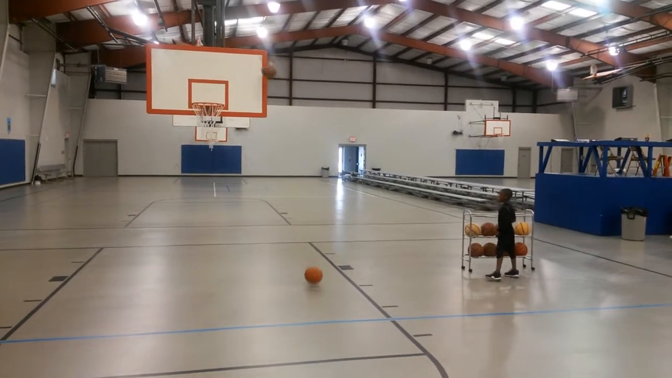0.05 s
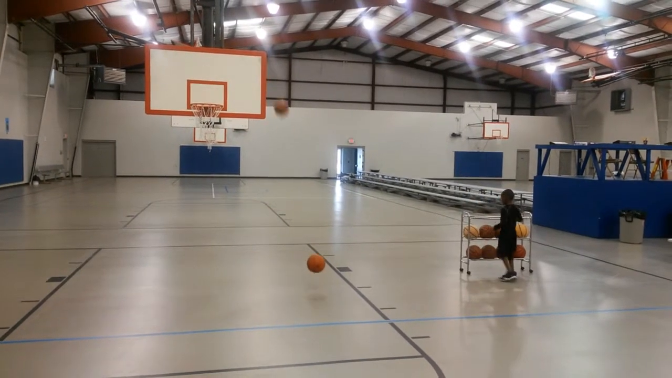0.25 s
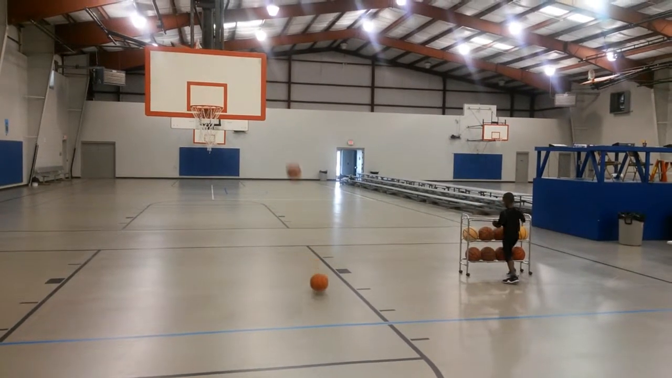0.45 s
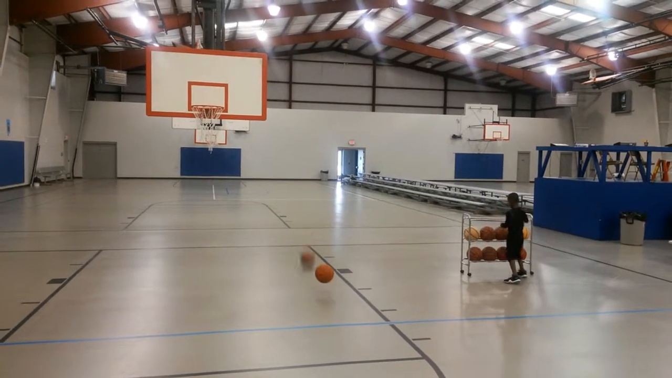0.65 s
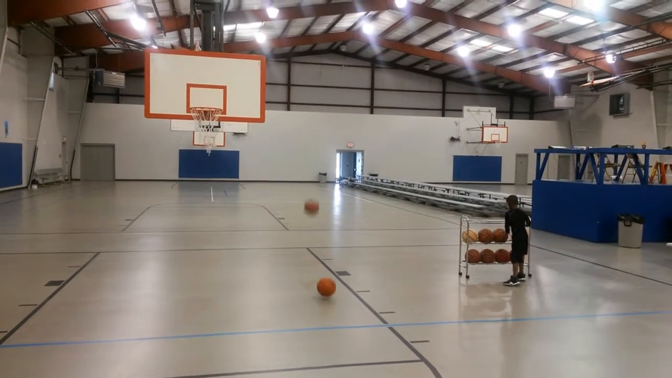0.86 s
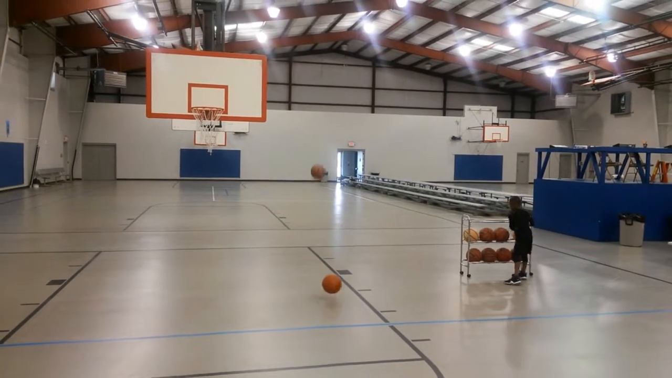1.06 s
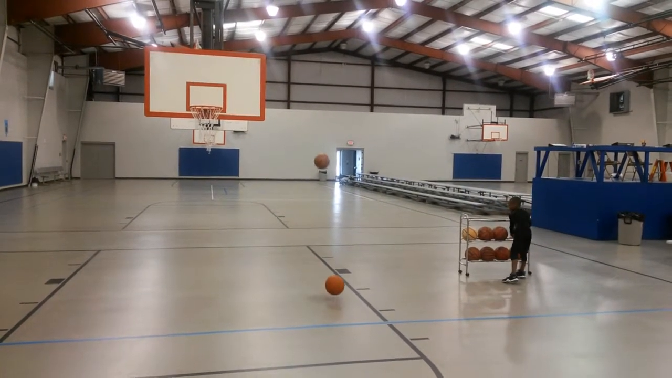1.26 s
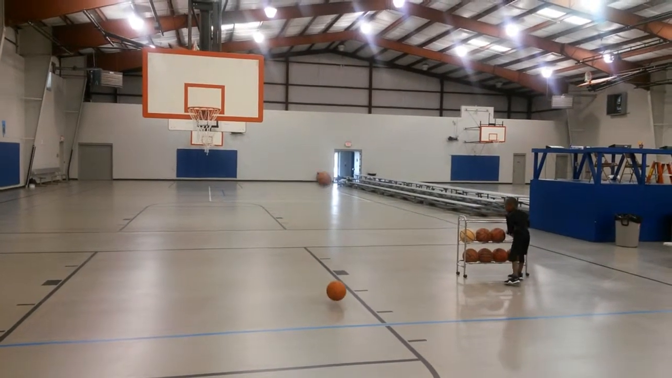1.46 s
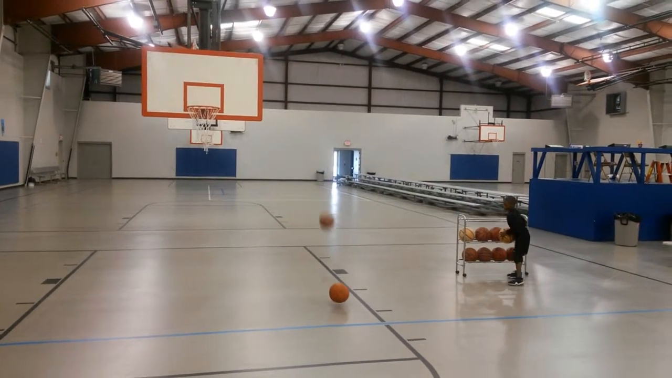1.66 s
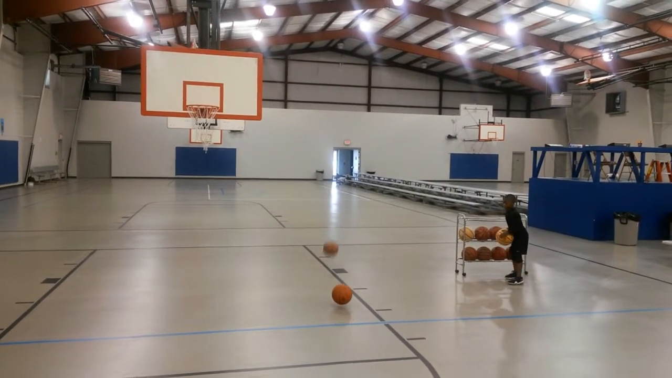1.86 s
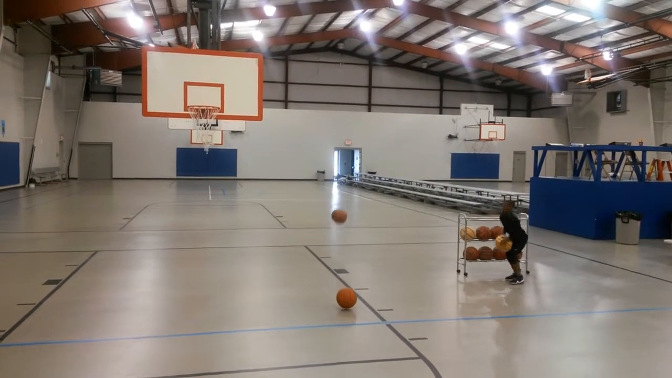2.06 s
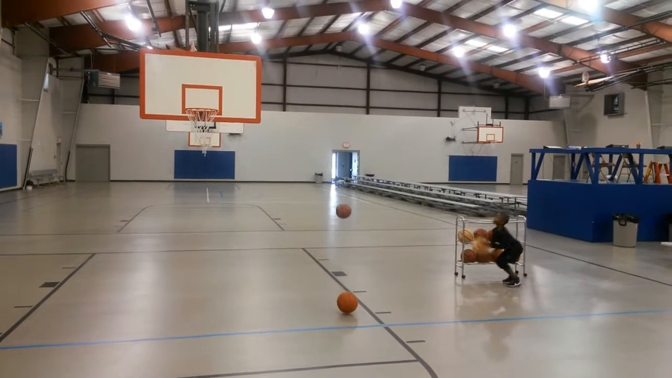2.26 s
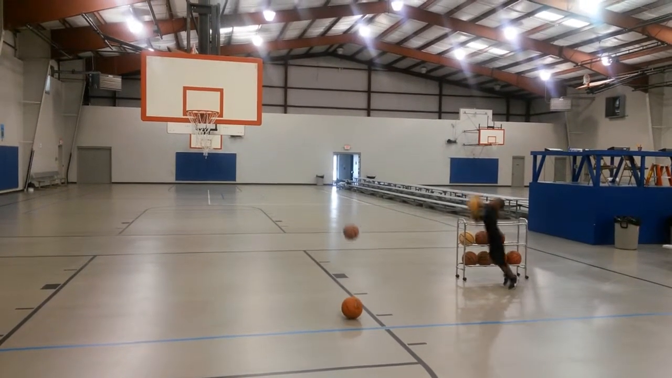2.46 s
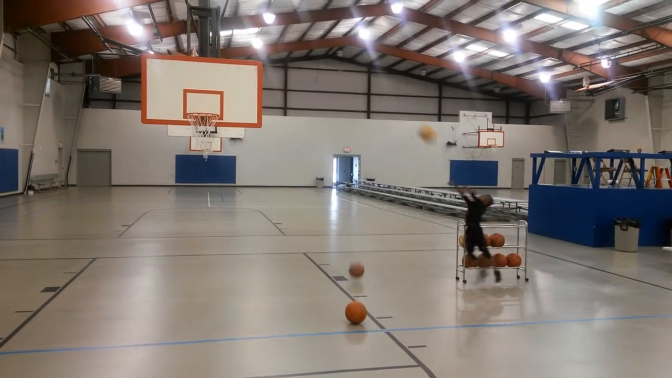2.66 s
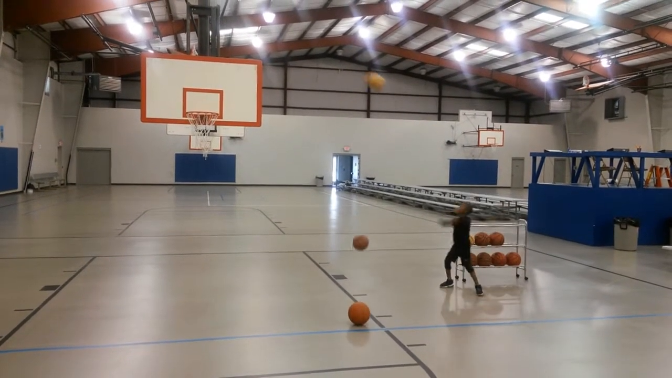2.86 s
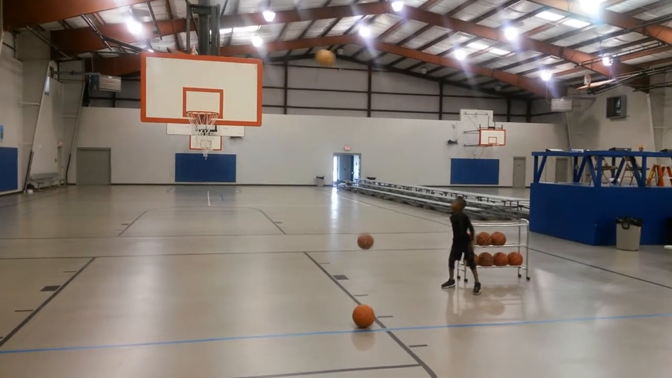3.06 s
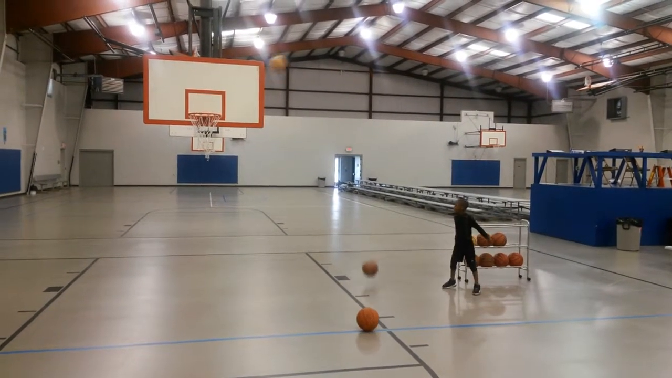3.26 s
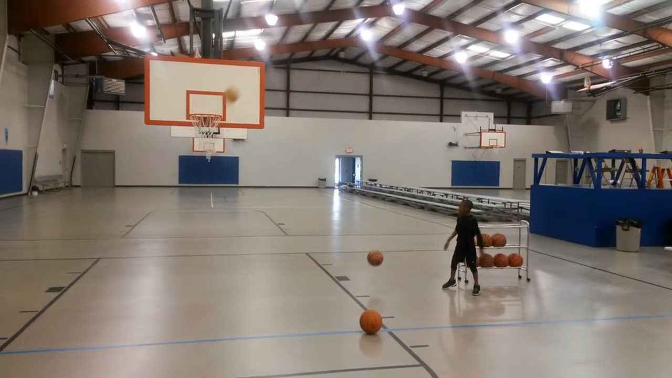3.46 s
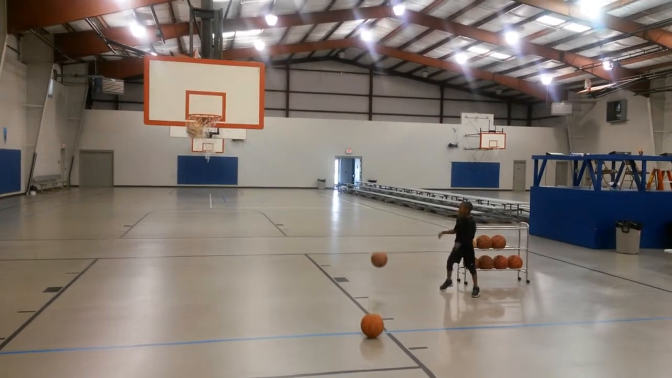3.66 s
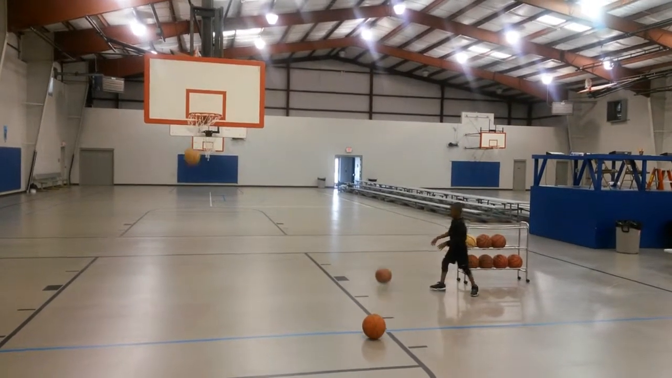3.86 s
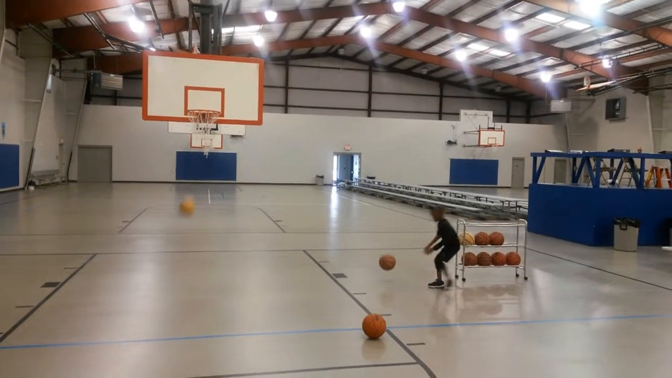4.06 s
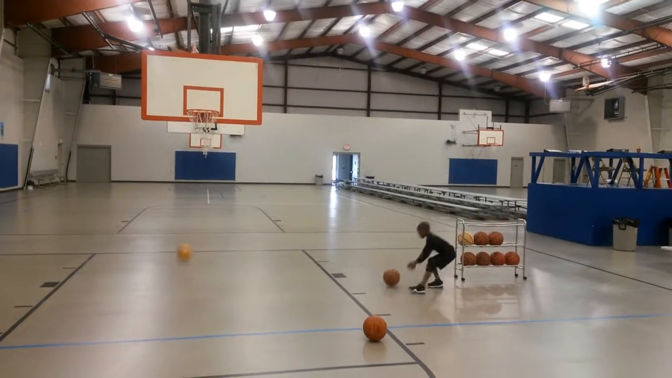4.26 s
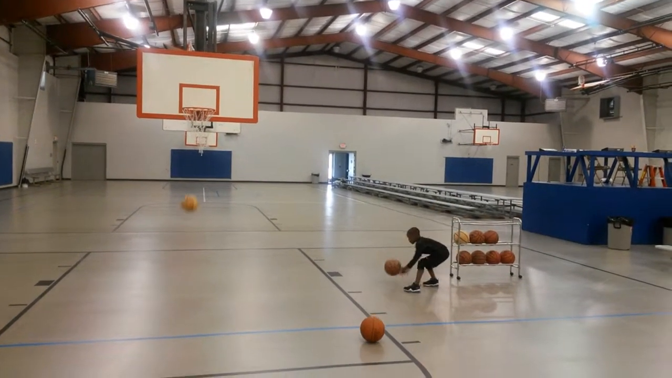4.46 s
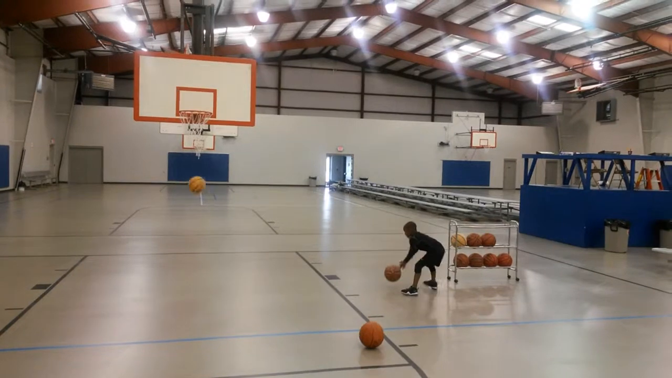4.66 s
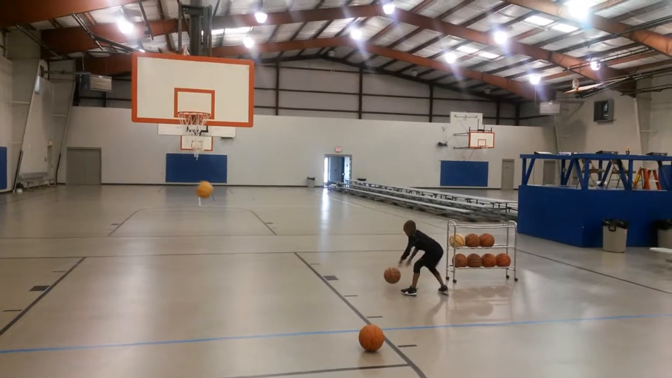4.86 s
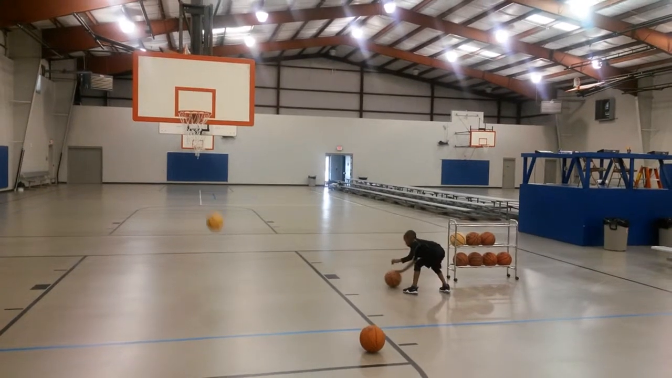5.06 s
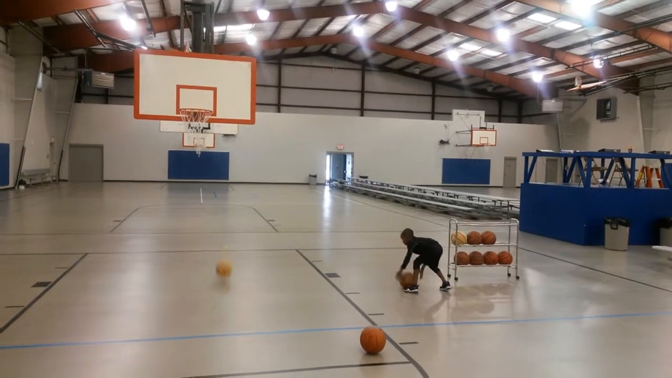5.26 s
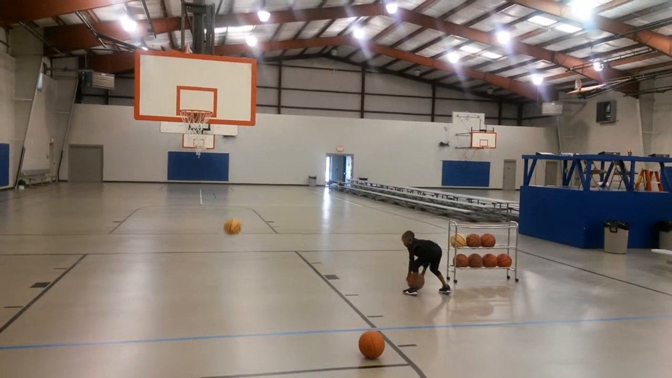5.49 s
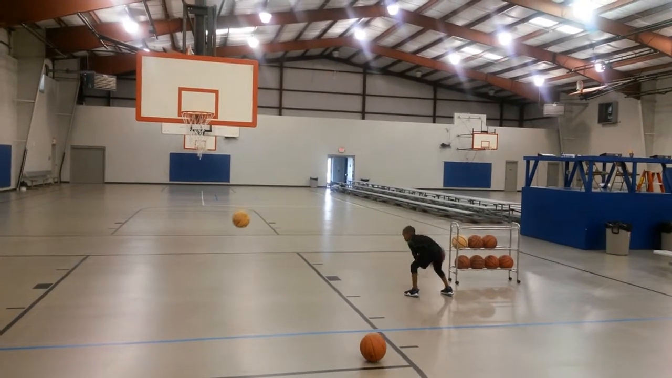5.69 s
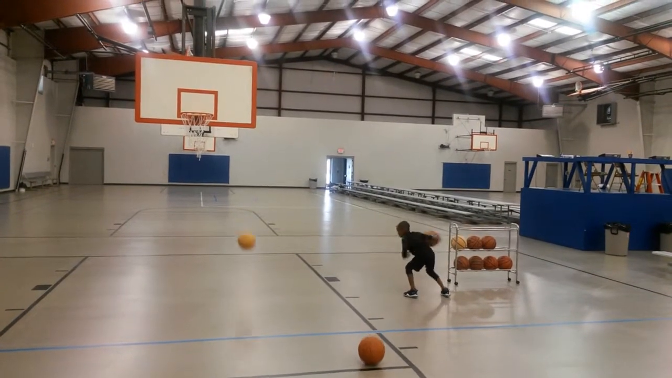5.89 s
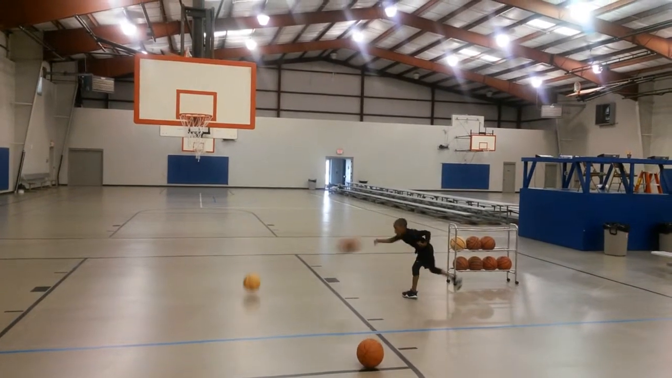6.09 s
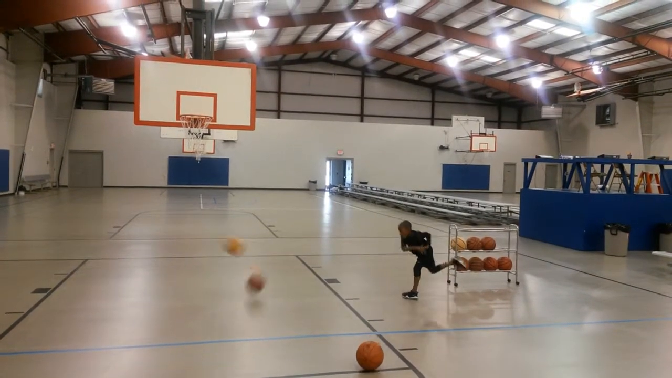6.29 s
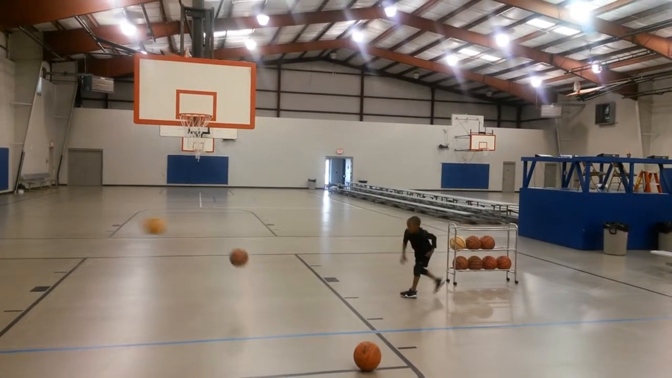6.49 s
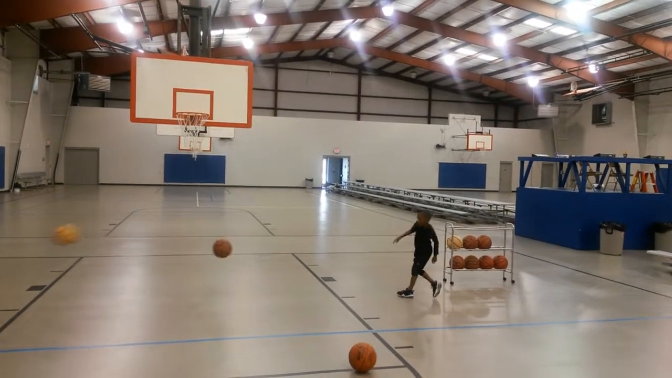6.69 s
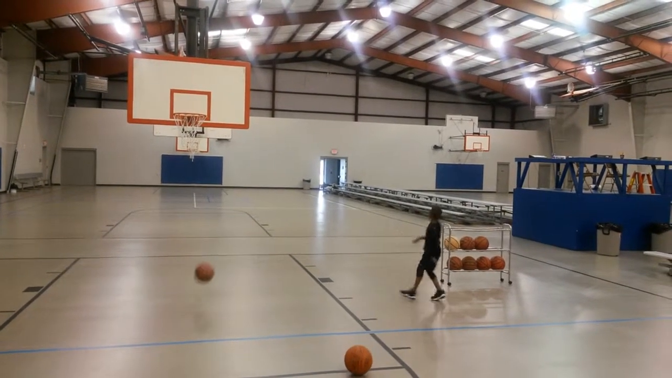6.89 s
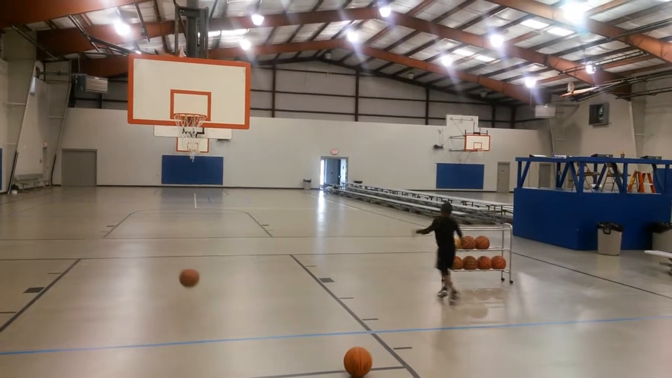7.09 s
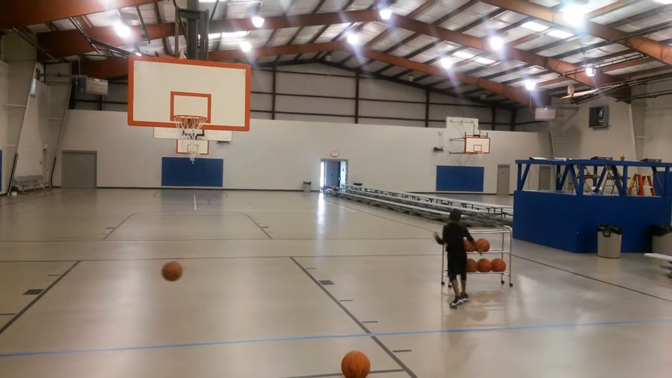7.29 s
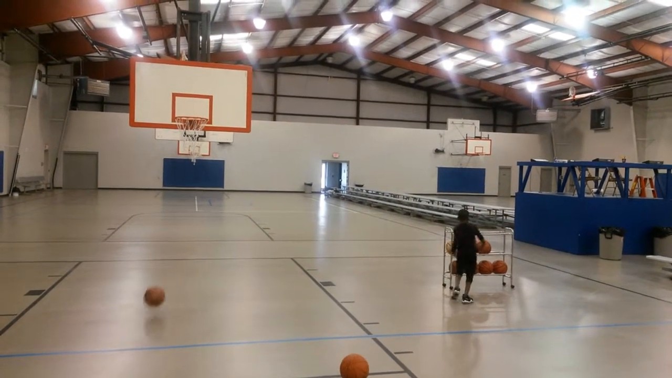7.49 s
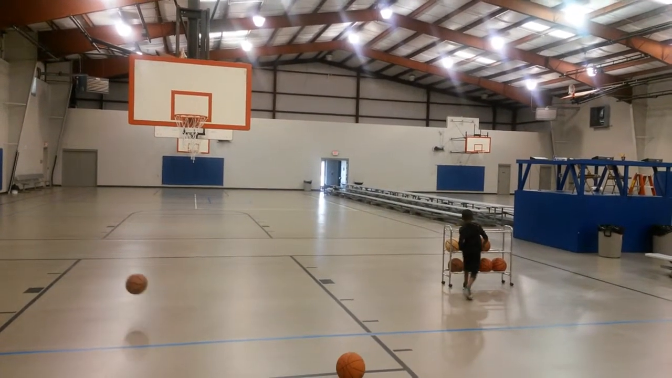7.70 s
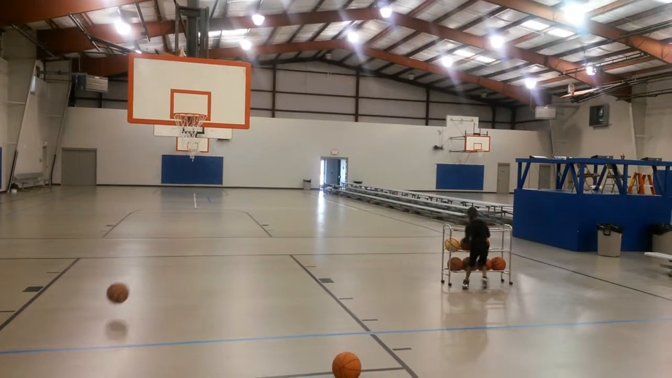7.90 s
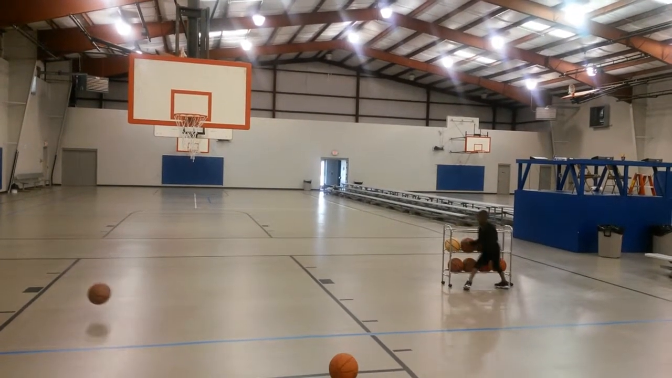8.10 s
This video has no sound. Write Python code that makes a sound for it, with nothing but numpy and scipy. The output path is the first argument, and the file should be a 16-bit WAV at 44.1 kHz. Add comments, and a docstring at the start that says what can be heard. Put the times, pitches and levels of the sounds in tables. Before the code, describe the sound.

Basketballs bounce hard on the floor of a big empty gym, each smack ringing on in long echoes, with one sharp shoe squeak.

```python
"""Basketballs bounce on the floor of a large empty gym while a player shoots; a shoe squeaks and the hoop rattles.
Each bounce adds short pulses: a thump, a knock, a slap and a hard crack, with a short ring of the air in the ball.
Walls and roof answer each bounce, then the hall rings on as fading noise; it still rings from an earlier bounce.
Squeaks are gliding tones, rattles are fading noise. A mains buzz whines high up all the time, over soft air noise."""
import sys
import numpy as np
from scipy import signal
from scipy.fft import rfft, irfft
from scipy.io import wavfile
from scipy.ndimage import uniform_filter1d

SR = 44100
rng = np.random.default_rng(int(sys.argv[2]) if len(sys.argv) > 2 else 0)


def unload_audio(sound):
    """Save the sound as a 16-bit wav file, at the path given as the first command line argument."""
    columns = np.transpose(np.atleast_2d(sound))
    # keep every value between -1 and 1, then stretch to whole-number steps
    steps = np.round(np.clip(columns, -1, 1) * 32767)
    wavfile.write(sys.argv[1], SR, steps.astype(np.int16))


N = 358974
T = np.arange(N) / SR  # time in seconds


# every ball hit: (t/s, strength level/dB, weight level/dB, crispness level/dB, hollowness level/dB, hall level/dB)
# weight lifts the thump and crispness the crack, both against the strength; hollowness trades slap for knock
BALL_HITS = [(.15, -34, -7.5, 9.5, -3, -1.5), (0.5851, -39, -1.5, 11.5, -0.5, 5),
             (0.7804, -19.5, -2, 0, 1, 1.5), (1.2484, -37, 0.5, 9, -0.5, 5.5),
             (1.5023, -48, -8, 10, -4, -14), (1.7168, -48.5, -15, 6.5, -4, -11),
             (1.9127, -27.5, -0.5, 5, 2, 0.5), (2.7578, -29.5, -3.5, 10, 3, 0),
             (3.4184, -37, 3.5, 9.5, 0.5, 1), (3.9483, -38.5, -5, 6, 3, -2), (4.3357, -26, 1.5, 3, -0.5, 1),
             (4.8803, -51, 3, 3, -3, 1), (5.134, -50, 6.5, -3, -4.5, -7), (5.362, -28, -2.5, 7, -1, 0.5),
             (6.1955, -28.5, -4.5, 3, 3.5, -2.5), (6.3499, -32.5, 4, 9.5, -6.5, -0.5),
             (6.4359, -23.5, 3.5, -5, 2.5, -4), (7.0763, -36.5, 4.5, -7, 2.5, 5.5),
             (7.1061, -30, -4.5, -4, 5, -3.5), (7.6473, -38.5, -1.5, -0.5, 1, 3),
             (7.7553, -37.5, 1, -4.5, 2, 2), (7.8111, -49.5, 5, 11, 3, 1), (8.0847, -44, 1.5, 2, 1, 5)]
# where the ball in play lands: (t/s, angle to one side/degrees)
# a positive angle makes the crack louder on the left and the left channel later
BALL_ANGLES = [(0, 5), (1.9, 3.5), (2.8, -6), (3.95, -5), (4.33, 29.5), (6.4, 13), (7.1, 43), (8.1, 27.5)]
LAG_ASIDE_MS = .44  # left channel lag for a hit fully to one side
# the wall just behind the listener returns a dull copy
NEAR_WALL_S, NEAR_WALL_DB, NEAR_WALL_CUTOFF_HZ = .0095, -7, 2200


def bounces(bands):
    """Ball meets floor: we hear the hit itself, then the near wall, the far surfaces and the hall."""
    out = np.zeros((2, N))
    dulling = signal.butter(2, NEAR_WALL_CUTOFF_HZ, fs=SR, output="sos")
    for s, strength_db, weight_db, crisp_db, hollow_db, hall_db in BALL_HITS:
        aside = np.sin(np.radians(np.interp(s, *np.transpose(BALL_ANGLES))))
        lag_ms = LAG_ASIDE_MS * aside
        direct, spread = strike(strength_db, weight_db, crisp_db, hollow_db, aside)
        add(out, direct, s, lag_ms)
        dull = signal.sosfilt(dulling, direct)
        wall_s = s + NEAR_WALL_S + 0.00065 * rng.standard_normal()
        add(out, undb(NEAR_WALL_DB) * dull, wall_s, lag_ms)
        early_echoes(out, spread, s)
        add(out, undb(hall_db) * reverberate(spread, bands), s)
    return out


# tone colours of the squeezed ball's thump, the shell's knock, and the skin's slap and crack
# each lists (f/multiple of the part's own pitch, level/dB)
THUMP_COLOUR = [(.14, -38), (.28, -16.5), (.52, 0), (1, 1), (1.35, -3), (1.8, -9), (2.5, -10), (5, -42)]
KNOCK_COLOUR = [(.3, -20), (.65, -12), (.87, -2.5), (1, 1), (1.17, 4), (1.5, -26), (3, -26)]
SLAP_COLOUR = [(.35, -29), (.65, -1), (.86, 2.5), (1, 2.5), (1.2, -1), (1.45, -10.5), (1.9, -9),
               (2.6, -10.5), (5, -85.5)]
CRACK_COLOUR = [(.3, -63), (.58, -15.5), (.82, -6.5), (1, 1.5), (1.15, -1), (1.4, -12), (2, -23.5)]
# tone colour of the clack between slap and crack, strongest for hits off to the side: (f/Hz, level/dB)
CLACK_COLOUR = [(1500, -37.5), (2400, -2.5), (3100, -5), (4100, 4), (5000, -1), (8000, -48.5)]
# tone colour of the very high tick as the crack overdrives the microphone: (f/Hz, level/dB)
OVERDRIVE_TICK_COLOUR = [(5000, -102), (8500, -2), (10500, 19.5), (12800, 35), (15000, -27)]
KNOCK_DB, SLAP_DB, TICK_DB = -2.5, 2, -6  # against the strength of the hit
CLACK_DB = -19  # against the crack, for a hit straight ahead
CLACK_ASIDE_DB, TICK_ASIDE_DB = 23.5, -32  # change for a hit fully to one side
HEAD_SHADOW_DB = 13  # left-right difference of the crack for a hit fully to one side


def strike(strength_db, weight_db, crisp_db, hollow_db, aside):
    """The skin cracks and slaps, the shell knocks, then the squeezed ball thumps; returns direct and spread sound."""
    thump_db, crack_db = strength_db + weight_db, strength_db + crisp_db
    knock_db = strength_db + KNOCK_DB + hollow_db
    slap_db = strength_db + SLAP_DB - hollow_db
    clack_db = crack_db + CLACK_DB + CLACK_ASIDE_DB * abs(aside)
    tick_db = strength_db + TICK_DB + TICK_ASIDE_DB * abs(aside)
    thump_hz, knock_hz, slap_hz, crack_hz = pitches(strength_db, thump_db, crisp_db, aside)

    thump = -undb(thump_db) * delayed(blow(THUMP_COLOUR, thump_hz), 0.00085)
    knock, slap = blow(KNOCK_COLOUR, knock_hz), blow(SLAP_COLOUR, slap_hz)
    crack, clack = -blow(CRACK_COLOUR, crack_hz), -blow(CLACK_COLOUR)
    tick = undb(tick_db) * shell(blow(OVERDRIVE_TICK_COLOUR), share_db=10, decay_s=0.00063)

    # the direct sound carries the ripple of the skin
    direct = thump + undb(clack_db) * shell(clack, share_db=1, decay_s=0.0012)
    direct += undb(knock_db) * shell(knock, share_db=0, decay_s=0.0036)
    direct += undb(slap_db) * (shell(slap, share_db=-7, decay_s=.001) + undb(-17) * ball_ring())
    shadow = undb(HEAD_SHADOW_DB * aside * np.array([[.5], [-.5]]))
    direct = direct + shadow * undb(crack_db) * shell(crack, share_db=-7, decay_s=.0008) + tick

    # the hall gets the even average of all directions
    spread = thump + undb(clack_db) * clack + undb(knock_db - 4.5) * knock
    spread += undb(slap_db) * slap + undb(crack_db + 2) * crack + undb(-6) * tick
    return direct, spread


# pitch at the reference level or hardness, and the dB that shift it by one octave
THUMP_HZ, THUMP_REF_DB, THUMP_OCTAVE_DB = 253.4, -34.5, 120
KNOCK_HZ, HARD_HIT_DB, KNOCK_OCTAVE_DB = 1146, -28, 33
CRACK_HZ, CRACK_OCTAVE_DB, CRACK_ASIDE_OCT = 5820, 198, 0.26
SLAP_HZ = 1877
PITCH_SCATTER = 0.038  # fraction; no two hits land on the same patch of skin


def pitches(strength_db, thump_db, crisp_db, aside):
    """Heavy blows squeeze the ball longer and sound lower; the crack rises when crisp and falls off to the side."""
    thump_hz = THUMP_HZ * 2 ** ((THUMP_REF_DB - thump_db) / THUMP_OCTAVE_DB)
    knock_hz, slap_hz = np.array([KNOCK_HZ, SLAP_HZ]) * (1 + PITCH_SCATTER * rng.standard_normal(2))
    knock_hz *= 2 ** (min(HARD_HIT_DB - strength_db, 0) / KNOCK_OCTAVE_DB)  # only hard hits shift
    crack_hz = CRACK_HZ * 2 ** (crisp_db / CRACK_OCTAVE_DB - CRACK_ASIDE_OCT * abs(aside))
    return thump_hz, knock_hz, slap_hz, crack_hz


def shell(x, share_db, decay_s, size=512):
    """The pulse runs on round the ball's skin for a few milliseconds, as fading noise."""
    ripple = rng.standard_normal(size) * np.exp(-T[:size] / decay_s) * (T[:size] > .0003)
    ripple *= undb(share_db) / np.sqrt(np.sum(ripple ** 2))
    return burst(x + signal.fftconvolve(x, ripple)[:len(x)])


# typical ringing tones of the air inside the ball: (f/Hz, level/dB, time to fade by 60 dB/s)
BALL_AIR_TONES = [(1012, -1, 0.082), (1550, -12, 0.3), (1992, 10, 0.14), (2930, 3, 0.21)]


def ball_ring(size=4096):
    """The air in the ball pings briefly, a little differently at every blow."""
    t, ring = T[:size], np.zeros(size)
    for hz, db, t60 in BALL_AIR_TONES:
        level = undb(db + 2 * rng.standard_normal())
        tone = np.sin(2 * np.pi * hz * (1 + 0.027 * rng.standard_normal()) * t)
        ring += level * tone * np.exp(-np.log(1000) * t / t60)
    return burst(ring)


# first echoes from roof, two flutters between floor and roof, and far wall: (level/dB, smear/s, treble
# level/dB)
SURFACES = [(-3, 0.00668, -11.5), (-24.5, 0.0037, 7.5), (-27, 0.004, -25), (-16, 0.0012, -2.5)]
# typical delay of each of those echoes after the hit: (t/s)
SURFACE_DELAYS = [.029, .074, .127, .16]


def early_echoes(out, x, s):
    """Roof and walls answer one by one; path lengths change as the balls move about."""
    for delay, (db, smear_s, treble_db) in zip(SURFACE_DELAYS, SURFACES):
        echo = undb(db) * reflect(x, smear_s, treble_db)
        add(out, echo, s + delay + 0.00088 * rng.standard_normal())


def reflect(x, smear_s, treble_db, size=2048):
    """A surface mirrors the lows and scatters the highs, split at 600 Hz."""
    low = signal.sosfilt(signal.butter(2, 600, fs=SR, output="sos"), x)
    high = signal.sosfilt(signal.butter(2, 600, "high", fs=SR, output="sos"), x)
    scatter = rng.standard_normal((2, size)) * np.sqrt(T[:size]) * np.exp(-T[:size] / smear_s)
    scatter /= np.sqrt(np.sum(scatter ** 2) / 2)
    scattered = signal.fftconvolve(high[None], scatter, axes=1)[:, :len(x)]
    return delayed(low, smear_s / 2) + undb(treble_db) * scattered


# short high chirps: (t/s, chirp level/dB, pitch f/Hz, length/s, scuff noise level/dB)
HIGH_CHIRPS = [(0.39, -34, 5580, 0.0064, -33.5), (0.425, -50, 5700, 0.0091, -38),
               (0.946, -22, 6460, 0.00033, -21.5), (2.8922, -6.5, 6280, 0.0014, -15),
               (2.921, -23, 6200, 0.0012, -20.5), (2.9305, -20.5, 5950, 0.0029, -26)]
# bright tick of the far wall's echo of the hard bounce at 0.78 s; all the other chirps are shoe squeaks
FAR_WALL_TICK = HIGH_CHIRPS[2]
SHOE_SQUEAKS = [*HIGH_CHIRPS[:2], *HIGH_CHIRPS[3:]]


def far_wall_tick(bands):
    """The far wall returns a hard bounce as one bright tick: a very short chirp and noise."""
    out = np.zeros((2, N))
    add_chirp(out, bands, *FAR_WALL_TICK)
    return out


def add_chirp(out, bands, s, chirp_db, hz, length, scuff_db):
    """A short tone gliding down, with bright noise that runs on as it dies, and its hall tail."""
    t = T[:int(SR / 10)] - 1 / 20
    phase = 2 * np.pi * hz * (t - 3.7 * t ** 2)
    chirp = undb(chirp_db) * np.exp(-(t / length) ** 2) * np.sin(phase)
    colour = [(2500, -30), (4500, -19), (5400, 4), (6400, 0.5), (8000, -14), (13000, -35)]  # (Hz, dB)
    scuff = undb(scuff_db) * (t > 0) * np.exp(-abs(t) / length / 2) * noise(colour, len(t))
    sound = chirp + scuff
    add(out, sound, s + t[0])
    add(out, undb(3.5) * reverberate(sound, bands), s + t[0])


# tone colour of the dull noise in both the landing and the hoop's rattle: (f/Hz, level/dB)
DULL_COLOUR = [(60, -20), (130, -4), (400, 5), (800, -0.5), (1800, -3.5), (2600, -17), (6000, -32),
               (12000, -70)]
LANDING_S, LANDING_DB = 2.929, -35


def shoes(bands):
    """Rubber soles chirp and scuff for a few milliseconds; the player lands from a jump shot."""
    out, t = np.zeros((2, N)), T[:int(SR / 10)]
    for squeak in SHOE_SQUEAKS:
        add_chirp(out, bands, *squeak)
    pat = undb(LANDING_DB) * burst(noise(DULL_COLOUR, len(t)) * np.exp(-t / 0.014))
    add(out, pat, LANDING_S)
    add(out, undb(-2.5) * reverberate(pat, bands), LANDING_S)
    return out


# dull rattles of hoop and backboard: (t/s, level/dB, decay/s, board boom level/dB)
HOOP_RATTLES = [(.005, -39, 0.11, -46.5), (3.644, -40.5, 0.082, -43.5), (3.715, -40.5, 0.059, -60),
                (3.755, -40, 0.031, -54)]
BOARD_HZ, BOARD_T60_S = 94.8, 2.06  # boom pitch, and its time to fade by 60 dB


def hoop(bands):
    """A shot shakes rim and net; the backboard booms unevenly under them, as narrow low noise."""
    out, t = np.zeros((2, N)), T[:SR]
    rise = 1 - np.exp(-t / 0.0046)
    board_colour = [(BOARD_HZ / 2, -50), (BOARD_HZ * 0.895, -14), (BOARD_HZ, 0),
                    (BOARD_HZ * 1.4, -14), (BOARD_HZ * 2, -40)]
    for s, db, decay, boom_db in HOOP_RATTLES:
        rattle = undb(db) * rise * np.exp(-t / decay) * noise(DULL_COLOUR, len(t))
        board = noise(board_colour, len(t))
        boom = undb(boom_db) * rise * board * np.exp(-np.log(1000) * t / BOARD_T60_S)
        add(out, rattle + boom, s)
        add(out, undb(-1) * reverberate(rattle, bands), s)
    return out


def earlier_bounce(bands):
    """The hall is still ringing from a bounce a moment ago; only its tail is heard."""
    hit = undb(-23.5) * blow(THUMP_COLOUR, 250) + undb(-24.5) * blow(SLAP_COLOUR, 1900)
    hit += undb(-17) * blow(CRACK_COLOUR, 6140)
    out = np.zeros((2, N))
    add(out, reverberate(hit, bands)[:, int(.25 * SR):], 0)
    return out


# how the hall rings in each band: (f/Hz, level/dB, time to fade by 60 dB/s, left-right likeness/0-1)
HALL_RING = [(60, -14.5, 2, 0.93), (115, 2, 2.2, 0.97), (260, -0.5, 3.4, 0.82), (566, 0.5, 1.72, 0.27),
             (1080, 0.5, 1.75, 0), (2050, -6.5, 2.24, 0.13), (3380, 1.5, 2.02, 0.08),
             (5700, -12.5, 1.94, 0.12), (12000, -4.5, 0.71, 0)]
GAIN_RECOVERY_S, FLUTTER_HZ, FLUTTER_DEPTH = 1, 23.37, 0.26


def hall_bands(size=100000):
    """Stereo noise and a fading envelope for each band of the hall."""
    centres = np.log([row[0] for row in HALL_RING])
    bins, t = np.log(np.fft.rfftfreq(2 * size, 1 / SR) + 1), T[:size]
    mid, side = rfft(rng.standard_normal((2, 2 * size)))
    # a gap before the far surfaces answer
    onset = np.clip((t - .021) / 0.003, 0, 1)
    # the tail starts lowered and recovers slowly, as the recorder's gain comes back
    recovery = 1 - 0.54 * np.exp(-t / GAIN_RECOVERY_S)
    # the lows flutter between floor and roof
    flutter = FLUTTER_DEPTH * np.cos(2 * np.pi * FLUTTER_HZ * (t - .04))
    bands = []
    for own, (hz, db, t60, alike) in zip(np.eye(len(HALL_RING)), HALL_RING):
        pair = np.sqrt((1 + alike) / 2) * mid + np.sqrt((1 - alike) / 2) * np.array([side, -side])
        hiss = irfft(pair * np.interp(bins, centres, own))
        fade = onset * recovery * (1 + flutter / (1 + hz / 900)) * np.exp(-np.log(1000) * t / t60)
        bands.append((hiss, undb(db) * fade / np.sqrt(np.sum(fade ** 2))))
    return bands


def reverberate(x, bands):
    """Every sound gets its own diffuse tail: a random stretch of the hall noise, faded band by band."""
    size = len(bands[0][1])
    i = rng.integers(size)
    tail = sum(hiss[:, i:i + size] * fade for hiss, fade in bands)
    return signal.fftconvolve(x[None], tail, axes=1)


# resonances rung by the buzz: (f/Hz, width f/Hz, left level/dB, right level/dB)
BUZZ_RESONANCES = [(5760, 60, -55, -74), (6225, 130, -42, -47.5), (6590, 300, -46.5, -57),
                   (6885, 170, -44, -45.5), (12830, 240, -58, -69), (13790, 200, -58, -69)]
BUZZ_HZ, BUZZ_LAG_MS = 120.01, 0.037  # ticks per second; lag of the left channel
BUZZ_FAINT_DB, BUZZ_LOW_HZ, BUZZ_HIGH_HZ = -70.5, 5900, 14000  # faint harmonics: typical level, range
BUZZ_SMEAR_RAD = 4.5  # phase spread: the hall blurs each tick of the buzz


def buzz(size=4096):
    """A tick on each half cycle of the mains rings a few high resonances; their harmonics waver slowly."""
    out, order = np.zeros((2, N)), np.arange(size // 2 + 1)
    place = (T * BUZZ_HZ % 1 * size).astype(int)  # position within one tick's cycle
    hz = order * BUZZ_HZ
    for channel in range(2):
        peaks = [undb(db[channel]) / (1 + (2 * (hz - centre) / width) ** 2)
                 for centre, width, *db in BUZZ_RESONANCES]
        level = np.max(peaks, axis=0)
        steady = level * np.exp(.6j * rng.standard_normal(len(order)))
        out[channel] = irfft(steady)[place]
        for _ in range(3):
            drifting = level * np.exp(2j * np.pi * rng.random(len(order)))
            out[channel] += 0.048 * walk(1.378) * irfft(drifting)[place]
    out[0] = delayed(out[0], BUZZ_LAG_MS / 1000)
    # the bare tick fills the treble with faint, uneven harmonics
    uneven_db = 3.5 * rng.standard_normal(len(order))
    faint = undb(BUZZ_FAINT_DB + uneven_db) * (hz > BUZZ_LOW_HZ) * (hz < BUZZ_HIGH_HZ)
    blur = BUZZ_SMEAR_RAD * rng.standard_normal(len(order)) + rng.standard_normal((2, len(order)))
    out += irfft(faint * np.exp(1j * blur))[:, place]
    return out * size / np.sqrt(2)  # makes the dB values the rms level of each harmonic


# tone colour of the hall's steady air and hiss: (f/Hz, relative level/dB per Hz)
AIR_COLOUR = [(15, -43), (30, -28), (60, -12), (130, 1), (278, -9), (604, -14), (1420, -14.5), (3300, -20),
              (5400, -14.5), (6500, -9), (7700, -21), (10900, -38), (13600, -17), (15000, -37)]
AIR_DB = -52


def air():
    """Ventilation rumble, mostly alike on both sides, and wider hiss; the shared part drifts in level."""
    mid = noise(AIR_COLOUR) * undb(2.4 * walk(2.985))
    width = gains([(40, -5), (80, -11.5), (250, -8), (700, 1), (2000, 4.5)], N)
    side = irfft(rfft(noise(AIR_COLOUR)) * width, N)
    return undb(AIR_DB) * (mid + np.array([side, -side]))


def undb(db):
    """Decibels to gain."""
    return 10 ** (np.asarray(db) / 20)


def unit(x):
    """Scale to rms 1."""
    return x / np.sqrt(np.mean(x ** 2))


def burst(x):
    """Scale to the energy of 10 ms at rms 1."""
    return x * np.sqrt(SR / 100 / np.sum(x ** 2))


def gains(points, size, stretch=1):
    """Gain of a tone colour on the bins of an FFT; stretch multiplies its frequencies."""
    hz, db = np.transpose(points)
    bins = np.log(np.fft.rfftfreq(size, 1 / SR) + 1)
    return undb(np.interp(bins, np.log(hz * stretch), db))


def noise(points, size=N):
    """Noise of a given colour, rms 1."""
    return unit(irfft(rfft(rng.standard_normal(size)) * gains(points, size), size))


def blow(points, stretch=1, size=4096):
    """A pulse of a given colour with its energy as early as possible (minimum phase)."""
    cepstrum = irfft(np.log(gains(points, size, stretch)))
    cepstrum[1:size // 2] *= 2
    cepstrum[size // 2 + 1:] = 0
    return burst(irfft(np.exp(rfft(cepstrum))))


def walk(rate):
    """Smooth random wandering around zero, rms about 1, with rate new steps per second."""
    k = int(SR / rate)
    steps = np.repeat(rng.standard_normal(N // k + 1), k)
    return unit(uniform_filter1d(steps, k)[:N])


def delayed(x, s):
    """The same sound, s seconds later."""
    return np.interp(T[:len(x)] - s, T[:len(x)], x, left=0)


def add(out, x, s, lag_ms=0):
    """Mix a mono or stereo sound in at time s; lag_ms shifts the left side."""
    stereo = np.broadcast_to(x, (2, x.shape[-1]))
    for side, part, late in zip(out, stereo, (lag_ms / 1000, 0)):
        i = max(int(round((s + late) * SR)), 0)
        side[i:i + len(part)] += part[:max(N - i, 0)]


def scene():
    """Everything that sounds in the gym."""
    bands = hall_bands()
    balls = bounces(bands) + far_wall_tick(bands) + earlier_bounce(bands)
    return balls + shoes(bands) + hoop(bands) + buzz() + air()


def record(dry):
    """Peaks beyond full scale are clipped as the recorder overloads; the top is cut above 14.8 kHz."""
    top_cut = signal.ellip(8, .2, 70, 14800, fs=SR, output="sos")
    return signal.sosfilt(top_cut, np.clip(dry, -1, 1))


dry = scene()
out = record(dry)
unload_audio(out)
```